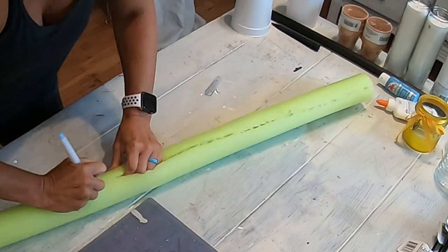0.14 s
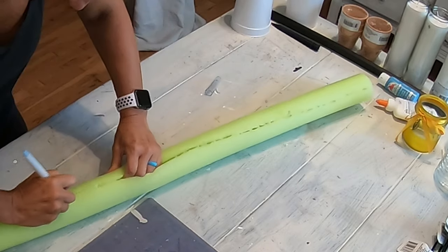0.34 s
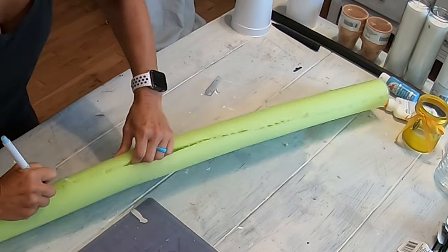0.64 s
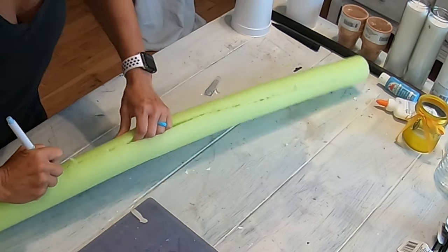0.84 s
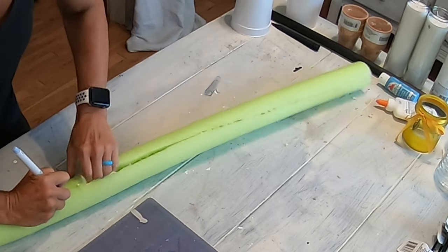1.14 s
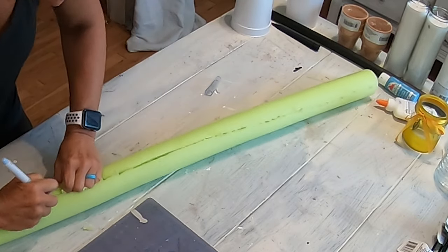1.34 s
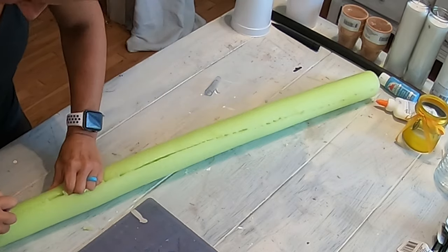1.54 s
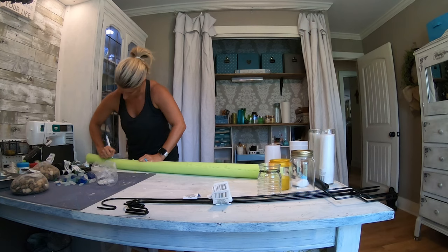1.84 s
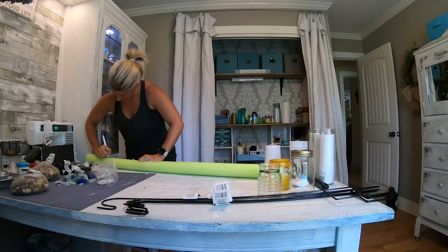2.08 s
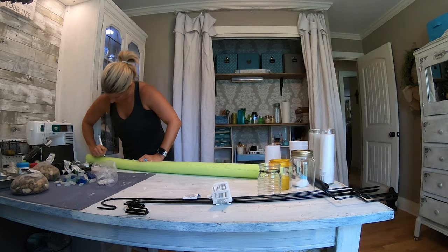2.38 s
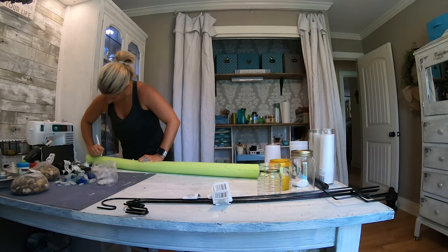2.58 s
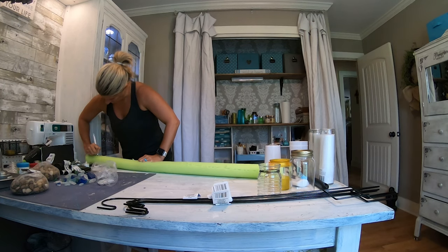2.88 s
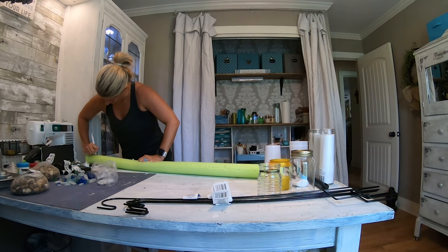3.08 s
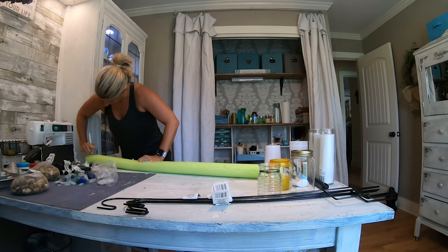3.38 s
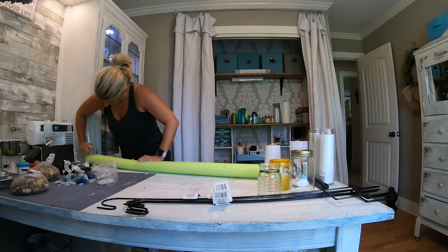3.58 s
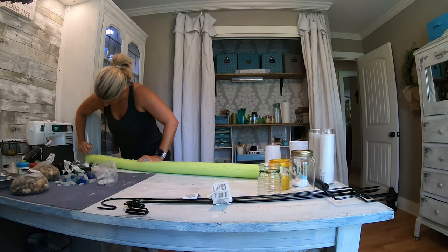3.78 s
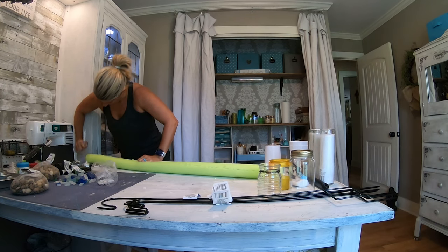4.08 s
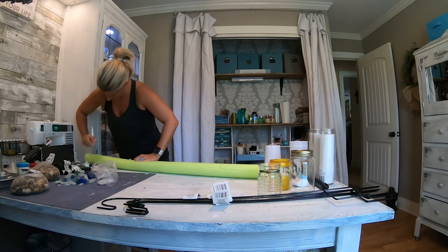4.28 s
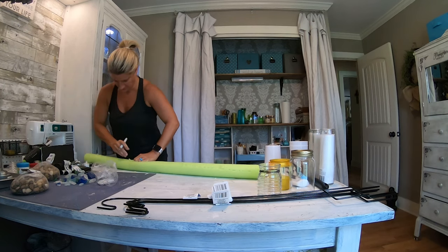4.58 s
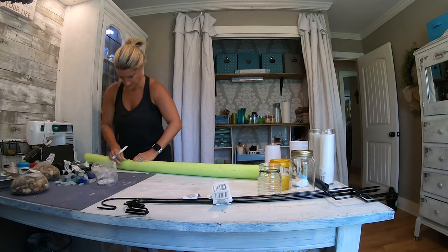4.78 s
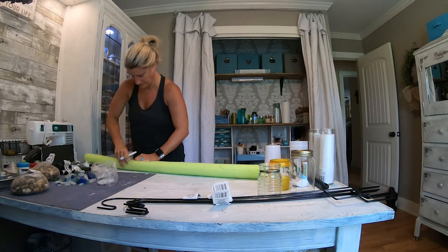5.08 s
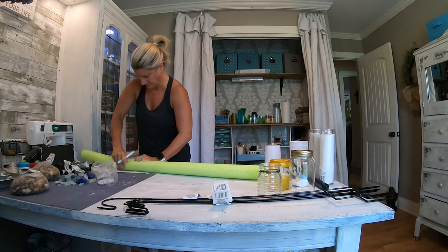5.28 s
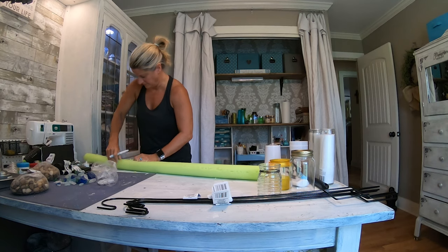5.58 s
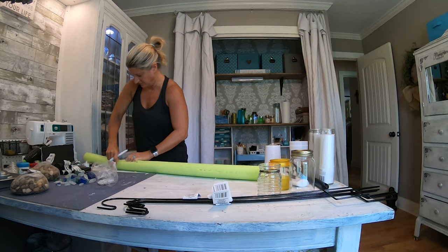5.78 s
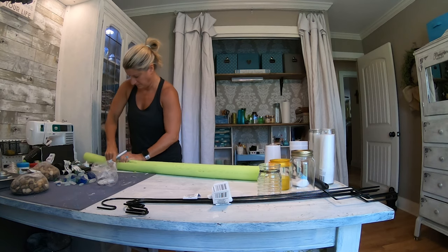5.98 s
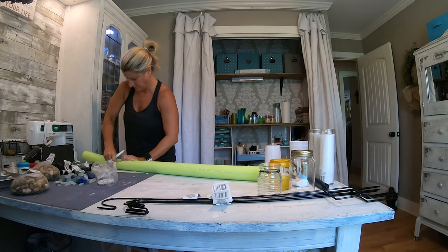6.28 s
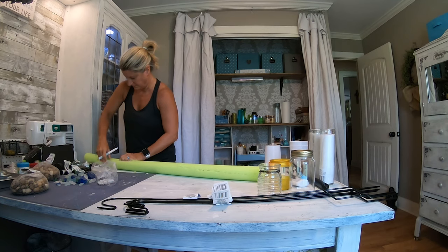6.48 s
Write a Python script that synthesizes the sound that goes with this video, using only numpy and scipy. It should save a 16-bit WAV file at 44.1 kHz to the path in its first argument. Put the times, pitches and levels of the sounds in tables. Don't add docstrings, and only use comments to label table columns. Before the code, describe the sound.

Sped-up, high-pitched sawing through a foam tube chatters in quick squeaky snaps, then drops to normal-speed crackly rasping cuts with dull table thuds.

```python
import sys
import numpy as np
from scipy import signal
from scipy.io import wavfile
from scipy.ndimage import uniform_filter1d

SR = 44100
rng = np.random.default_rng(int(sys.argv[2]) if len(sys.argv) > 2 else 0)


def attenuation_scalar(level_db):
    decades = np.asarray(level_db, float) / 20
    return 10 ** decades


def digitize_waveform(pressure):
    field = np.atleast_2d(pressure).T
    bounded = np.clip(field, -1, 1)
    quanta = np.round(bounded * 32767).astype(np.int16)
    wavfile.write(sys.argv[1], SR, quanta)


N = 292383
SPEED_UP, CHANGE_S = 3, 1.822
STEP = 32


def rms_one(x):
    return x / np.sqrt(np.mean(x ** 2) + 1e-20)


def at_hz(points, hz):
    table_hz, table_db = np.array(points).T
    return np.interp(np.log(hz), np.log(table_hz), table_db)


def drift(rate, size, sr):
    r = np.exp(-2 * np.pi * rate / sr)
    noise = rng.standard_normal(size + 3000)
    return rms_one(signal.lfilter([1], [1, -2 * r, r * r], noise)[3000:])


def band_pass(order, low_hz, high_hz):
    return signal.butter(order, [low_hz, high_hz], "band", fs=SR, output="sos")


def high_pass(hz):
    return signal.butter(2, hz, "high", fs=SR, output="sos")


def resonance(x, hz, width):
    r = np.exp(-np.pi * width / SR)
    poles = [1, -2 * r * np.cos(2 * np.pi * hz / SR), r * r]
    return signal.lfilter([(1 - r * r) / 2, 0, (r * r - 1) / 2], poles, x)


def crackle(size, speed, per_s, spread_db, lumpy_db, grain_share):
    bursting = rng.random(size) < per_s * speed / SR
    clicks = bursting * attenuation_scalar(spread_db * np.minimum(rng.exponential(1, size), 4))
    lumps = attenuation_scalar(lumpy_db * drift(90 * speed, size, SR))
    share = np.clip(grain_share, 0, 1)
    grains = rms_one(clicks * rng.choice([-1, 1], size))
    near = np.sqrt(share) * grains + np.sqrt(1 - share) * rng.standard_normal(size)
    diffuse = rng.standard_normal(size)
    return np.array([rms_one(near * lumps), diffuse])


def echoes(x, speed, t60, wet_db, change):
    n, hop = np.arange(int(.12 * SR / speed)), int(.4 * SR / speed)
    fade = attenuation_scalar(-60 * n * speed / (t60 * SR))
    kept = rng.standard_normal((len(x), len(n)))
    wet = np.zeros((len(x), x.shape[1] + len(n)))
    for a in range(0, x.shape[1], hop):
        tail = (kept + change * rng.standard_normal(kept.shape)) * fade
        tail = tail / np.sqrt(np.sum(tail ** 2) / len(x))
        piece = signal.fftconvolve(x[:, a:a + hop], tail, axes=1)
        wet[:, a:a + piece.shape[1]] += piece
    return rms_one(x + attenuation_scalar(wet_db) * wet[:, :x.shape[1]])


ATTACK_S = [.002, .004, .02, .04]
BITE_DB = [4, 5, 19, 35.5]
SAG_DB = [5.26, 2.4, 3.2, 4.3]


def push_shape(since, hold, speed, release):
    bite_s = 0.0026
    attack, bite, sag, fall = (np.array(c)[:, None] for c in (ATTACK_S, BITE_DB, SAG_DB, release))
    u, hold = np.maximum(since, 0) * speed, max(hold * speed, 1e-3)
    rising = 20 * np.log10(np.clip(since * speed / attack, 1e-5, 1))
    held = bite * np.exp(-u / bite_s) - sag * np.minimum(u / hold, 1)
    return rising + held - fall * np.maximum(u - hold, 0)


def stroke_levels(strokes, t, speed):
    cuts, rubs, thuds, release, quiet_db, table_db = strokes
    thud_in_tube_db = -9.5
    power = attenuation_scalar(2 * np.array(quiet_db))[:, None] + 0 * t
    for s, db, hold, fizz_db, tube_db in cuts:
        layers_db = db + np.array([[0], [fizz_db], [tube_db], [table_db]])
        power += attenuation_scalar(2 * (layers_db + push_shape(t - s, hold, speed, release)))
    for s, db, width, fizz_db, tube_db in rubs:
        layers_db = db + np.array([[0], [fizz_db], [tube_db], [table_db]])
        power += attenuation_scalar(2 * (layers_db - 10 * ((t - s) / width) ** 2))
    for s, db, hold in thuds:
        layers_db = db + np.array([[thud_in_tube_db], [0]])
        power[2:] += attenuation_scalar(2 * (layers_db + push_shape(t - s, hold, speed, release)[3]))
    return 10 * np.log10(power)


# [pitch_hz, width_hz, level_db]
TUBE = [(210.7, 19.4, 9), (342, 33, -9), (707, 71, 4.5), (1095, 255, -0.5), (1750, 170, -50),
        (2540, 180, -20)]
# [pitch_hz, likeness 0 to 1]
LIKENESS = [(40, 0.56), (380, 1), (700, 0.56), (2400, 0.55), (4200, 0.87), (6000, 0.18), (13000, 0.036)]


def sawing(strokes, spectrum, bands, start, size, speed, patchy_db, ring_db):
    t = (start + np.arange(0, size + STEP, STEP)) / SR
    grid = np.geomspace(30, 16000, 400)
    power = attenuation_scalar(2 * at_hz(spectrum, grid)) * np.gradient(grid)
    held = [10 * np.log10(power[(grid > a) & (grid < b)].sum()) for a, b in bands]
    order = np.argsort([a for a, b in bands])
    centres = np.log([np.sqrt(a * b) for a, b in bands])[order]
    lift = (stroke_levels(strokes, t, speed) - np.array(held)[:, None])[order]
    sources = [crackle(size, speed, per_s=2300.0, spread_db=6.0, lumpy_db=2.5, grain_share=0.61)
               for k in range(2)]
    sources = [echoes(rows, speed, t60=.16, wet_db=0., change=1.7) for rows in sources]
    edges = 40 * 2 ** np.arange(0, 8.8, .3)
    out = np.zeros((2, size))
    for k, (low, high) in enumerate(zip(edges, edges[1:])):
        mid, side = signal.sosfilt(band_pass(2, low, high), sources[k % 2])
        hz = np.sqrt(low * high)
        weights = [np.interp(np.log(hz), centres, row) for row in np.eye(4)]
        patches = patchy_db * drift(14 * speed, len(t), SR / STEP)
        level_db = at_hz(spectrum, hz) + weights @ lift + patches
        gain = np.interp(np.arange(size) / STEP, np.arange(len(t)), attenuation_scalar(level_db)) * np.sqrt(SR / 2)
        alike = np.clip(at_hz(LIKENESS, hz / speed), 0, .98)
        out += gain * (np.sqrt((1 + alike) / 2) * mid + np.sqrt((1 - alike) / 2) * side * [[1], [-1]])
    rings = sum(resonance(out, hz * speed, width * speed) * attenuation_scalar(db + ring_db) for hz, width, db in TUBE)
    return out + rings


# [pitch_hz, level_db per Hz]
FAST_FOAM = [(35, -92), (60, -36), (256, -7.5), (315, -6), (389, -3.5), (621, -4.5), (822, -9), (1010, -5),
             (1110, -6), (2710, 2.5), (5590, 8), (10000, -4), (16000, -18.5)]
# [low_hz, high_hz]
FAST_BANDS = [
    (2400, 9000),
    (10000, 15000),
    (750, 1800),
    (200, 600),
]
# [start_s, tearing_db, hold_s, fizz_db re tearing, tube_db re tearing]
FAST_CUTS = [(.055, -26.5, 0.036, -4.5, -12), (.18, -23, 0.019, -4, -12), (.257, -23, 0.039, 1, -1),
             (.339, -27.5, 0.034, -2, -5), (.394, -35.5, 0.017, 0, 1), (.432, -30.5, 0.005, 3, 3),
             (.4385, -26, 0.012, 1, -5), (.449, -22, .006, 3, 2), (.457, -20, 0.024, -9, -6.5),
             (.499, -39, .006, -16, 17), (.521, -26, 0.0073, 1, -1), (.526, -26, 0.015, -1, -4),
             (.576, -29.5, 0.01, -4, -6), (.632, -38, 0.038, -4.5, -28), (1.042, -27, 0.0094, -8.5, 7),
             (1.13, -25.5, 0.051, -5, -4), (1.255, -28, 0.009, -5, -15), (1.2795, -18.5, 0.025, -9, -11.5),
             (1.332, -24, 0.0052, -15, 10.5), (1.388, -35, 0.013, 2, -13), (1.439, -28.5, 0.029, -4, -10.5),
             (1.519, -21.5, 0.047, -8.5, -12.5), (1.592, -21, 0.023, -5, -10),
             (1.62, -18.5, 0.024, -12, -12.5), (1.66, -20.5, 0.02, -12, -11),
             (1.6958, -14.5, 0.018, -18, -10.5), (1.7408, -18.5, 0.022, -16, -7.5),
             (1.774, -24.5, .008, -5, -6), (1.7855, -20.5, 0.026, -11.5, -8)]
# [middle_s, tearing_db, half_width_s, fizz_db re tearing, tube_db re tearing]
FAST_RUBS = [(.002, -37, 0.044, -1, -4.5), (.125, -44.5, 0.034, 1, -16), (.175, -33, 0.014, 1, -10),
             (.235, -42, 0.035, 1, 1), (0.56, -31, 0.027, -4, -4), (0.821, -47.5, 0.036, -1.5, -9),
             (0.919, -56, 0.021, -31, -5), (.975, -66, 0.007, -20, 0), (.722, -68, 0.0051, -13, 8),
             (.985, -49.5, 0.057, 0.5, -20), (1.101, -38, 0.052, -4, -9), (1.25, -39, 0.068, -4, 1),
             (1.43, -35.5, 0.037, 4.5, -11), (.361, -28, 0.0074, -15, -19), (.745, -77, 0.027, -14, 19.5),
             (1.02, -53, 0.012, -5, -1)]
# [start_s, level_db, hold_s]
FAST_THUDS = [(0.107, -21, 0.014), (0.127, -38, 0.018), (0.176, -21.5, 0.018), (0.197, -39, 0.016),
              (0.216, -43, 0.016), (0.26, -34, 0.016), (0.314, -41, 0.075), (0.442, -35.5, 0.032),
              (0.516, -39, 0.097), (0.616, -42, 0.05), (1.045, -28.5, 0.015), (1.117, -41, 0.068),
              (1.339, -29, 0.044)]
FAST_RELEASE_DB_PER_S = [242, 263, 248, 220]
FAST_QUIET_DB = [-66, -70, -68, -56.5]


def fast_sawing(size):
    table_share_db = -28
    strokes = (FAST_CUTS, FAST_RUBS, FAST_THUDS, FAST_RELEASE_DB_PER_S, FAST_QUIET_DB, table_share_db)
    return sawing(strokes, FAST_FOAM, FAST_BANDS, 0, size, SPEED_UP, patchy_db=1.8, ring_db=-13.5)


# [pitch_hz, level_db per Hz]
FOAM = [(30, -44), (55, -6), (113, 32.5), (272, -5), (316, -1.5), (612, -14), (700, -5.5), (1000, -7),
        (1900, 2.1), (2900, -0.5), (4100, -7.5), (6000, -6), (10500, -15.5), (16000, -27)]
# [low_hz, high_hz]
BANDS = [
    (800, 3000),
    (4000, 10000),
    (250, 600),
    (70, 200),
]
# [start_s, tearing_db, hold_s, fizz_db re tearing, tube_db re tearing]
CUTS = [(1.822, -16.5, 0.03, -6, -5), (1.857, -19.5, 0.064, -9.5, -16), (1.973, -17.5, 0.089, -5.5, -9),
        (2.104, -16, 0.013, -9.5, -12), (2.223, -14, 0.034, -6, -14), (2.345, -30, 0.037, 1, -7),
        (2.433, -25.5, 0.13, -2, -9), (2.476, -19, 0.054, -5, -3), (2.68, -19, 0.05, -4, -3),
        (2.861, -38, .015, 5.5, -12), (2.883, -38, .015, 8, -4), (2.907, -32.5, 0.032, 8.5, -1),
        (2.93, -21.5, 0.047, -2, -2), (3.098, -39.5, 0.0099, 10, -14), (3.139, -16, 0.012, -6, -25),
        (3.172, -14.5, 0.019, -10.5, -12), (3.265, -19, 0.028, -13, -10.5), (3.458, -45.5, 0.015, 10, 5),
        (3.618, -32.5, .02, -4.5, -24), (3.692, -18.5, 0.012, -6, -10.5), (3.804, -29.5, 0.012, -4.5, -21),
        (3.843, -30, 0.03, -9.5, -29), (3.897, -32.5, 0.11, -5.5, -21), (3.938, -15.5, 0.036, -12, -4),
        (4.577, -49.5, 0.13, -6.5, -6), (4.641, -31, 0.035, -12, -5.5), (4.928, -29.5, 0.041, -10.5, -9),
        (5.067, -28.5, 0.078, -18, -9.5), (5.103, -33, 0.068, -7.5, -10), (5.15, -24, 0.011, 1.5, 0),
        (5.183, -23, 0.075, -10, -10.5), (5.421, -39.5, .03, -5, -41), (5.752, -29.5, 0.035, -4.5, -8),
        (6.002, -28, 0.0086, -4, -7), (6.019, -19.5, 0.04, -12, -14), (6.055, -22, 0.039, -13.5, -10),
        (6.105, -30, 0.03, -7, 0), (6.143, -26.5, 0.042, -9, -3.5), (6.335, -25, 0.038, -14.5, -26)]
# [middle_s, tearing_db, half_width_s, fizz_db re tearing, tube_db re tearing]
RUBS = [(2.18, -32.5, 0.24, -5, -11), (2.63, -46.5, 0.53, 5, -1), (2.8, -44, 0.025, 11, -30),
        (3.235, -23, 0.077, -5, -6.5), (3.3, -32, 0.047, -2.5, -3), (3.515, -26.5, 0.038, 0, -10),
        (3.58, -39, 0.053, 0.5, -12), (3.664, -28.5, 0.04, -3, -7.5), (3.729, -35, 0.014, -16, 1.5),
        (4.008, -16.5, 0.062, -15.5, -5), (4.065, -30, 0.08, -14.5, 5), (4.148, -43, 0.033, -3, 3),
        (3.77, -42, 0.054, -9, -21), (4.309, -27.5, 0.079, -7, -13.5), (4.43, -50, 0.06, 8.5, 1),
        (4.699, -29, 0.033, -14, -9), (4.745, -35, 0.067, -11, -4.5), (4.85, -37, 0.046, -11.5, -11),
        (4.888, -33, 0.051, -10.5, -9.5), (4.99, -45, 0.021, -14, -19), (5.38, -46, 0.077, -8.5, -8.5),
        (5.518, -24.5, 0.068, -9.5, -1.5), (5.619, -25.5, 0.062, -12.5, -6.5),
        (5.71, -35.5, 0.079, -5.5, -4.5), (5.83, -25.5, 0.081, -8.5, -3.5), (5.896, -23, 0.058, -11, -12),
        (5.945, -25, 0.083, -11, -10), (6.28, -48.5, 0.063, 0, -2), (6.416, -21, 0.073, -13, -8.5),
        (6.496, -24, 0.068, -13.5, -11.5), (6.64, -22, 0.073, -7, -10.5)]
# [start_s, level_db, hold_s]
THUDS = [(1.841, -34, 0.06), (1.975, -34.5, 0.054), (2.099, -34, 0.021), (2.479, -30, 0.062),
         (2.692, -27, 0.017), (2.936, -33.5, 0.032), (3.15, -45, 0.16), (3.491, -60, 0.045),
         (3.688, -45, 0.011), (3.946, -24.5, 0.12), (4.1, -38, 0.12), (4.23, -40, 0.021),
         (5.471, -26.5, 0.053), (6.361, -25.5, 0.068)]
RELEASE_DB_PER_S = [205, 190, 215, 237]
QUIET_DB = [-56, -63.5, -66, -63]


def normal_sawing(start):
    table_share_db = -39.5
    strokes = (CUTS, RUBS, THUDS, RELEASE_DB_PER_S, QUIET_DB, table_share_db)
    return sawing(strokes, FOAM, BANDS, start, N - start, speed=1, patchy_db=1.2, ring_db=-4.0)


# [pitch_hz, level_db, decay_s]
BITE_MODES = [(675, -32.5, .004), (1140, -30.5, 0.0029), (1940, -23.5, 0.0066), (2624, -24, 0.0044),
              (3450, -29, 0.0023)]


def snaps(table, speed, decay_s, low_hz, high_hz, edge_db):
    out, n = np.zeros(N + 600), np.arange(600)
    noise = rng.standard_normal((len(table), 600))
    tear = np.hanning(2 + 9 // speed)[1:-1]
    sign = np.sign(noise[:, :1])
    noise[:, :len(tear)] = 6 * tear * sign
    bursts = noise * np.exp(-n * speed / (decay_s * SR))
    body = band_pass(1, low_hz * speed, high_hz * speed)
    edge = band_pass(2, high_hz * speed, min(2.4 * high_hz * speed, 16000))
    echo_s, echo_db = .0028, -6
    lag = round(echo_s * SR / speed)
    u = n * speed / SR
    modes = np.array([attenuation_scalar(db) * np.exp(-u / decay) * np.sin(2 * np.pi * hz * u)
                      for hz, db, decay in BITE_MODES])
    strengths = attenuation_scalar(3.7 * rng.standard_normal((len(table), len(modes))))
    rung = strengths @ modes * np.hanning(1200)[600:] * sign
    rung = signal.sosfilt(high_pass(400 * speed), rung)
    for (s, db), burst, ring in zip(table, bursts, rung):
        bite = signal.sosfilt(body, burst) + attenuation_scalar(edge_db) * signal.sosfilt(edge, burst)
        bite[lag:] += attenuation_scalar(echo_db) * bite[:-lag]
        at = round(s * SR)
        out[at:at + 600] += attenuation_scalar(db) * (bite / np.abs(bite).max() + ring)
    return out[:N]


def workroom(x, speed, t60, wet_db):
    n = np.arange(int(.5 * SR / speed))
    tail = rng.standard_normal((2, len(n))) * attenuation_scalar(-60 * n * speed / (t60 * SR)) * (n > .002 * SR / speed)
    tail = signal.lfilter([1], [1, -.5], tail)
    tail = tail / np.sqrt(np.sum(tail ** 2) / 2)
    return x + attenuation_scalar(wet_db) * signal.fftconvolve(x[None], tail, axes=1)[:, :N]


# [start_s, peak_db]
FAST_SNAPS = [(0.0215, -23.0), (0.0559, -14.0), (0.1844, -10.0), (0.2348, -24.0), (0.2618, -11.0),
              (0.2804, -8.0), (0.3076, -17.0), (0.3957, -14.0), (0.45, -5.0), (0.4592, -7.0),
              (0.5004, -14.0), (0.5262, -8.0), (1.0433, -14.0), (1.12, -19.0), (1.1336, -1.0),
              (1.1473, -8.0), (1.1602, -4.0), (1.2809, -7.0), (1.333, -18.0), (1.4401, -15.0),
              (1.4596, -14.0), (1.5266, -11.0), (1.5949, -5.0), (1.621, -3.0), (1.6605, -4.0),
              (1.6961, -2.0), (1.7412, -1.0), (1.7744, -7.0), (1.7858, -8.0), (1.8108, -7.0)]
# [start_s, peak_db]
SNAPS = [(1.8581, -1.5), (1.9734, 3), (1.9816, -8.0), (2.1076, -7.0), (2.1152, -10.0), (2.2255, -3),
         (2.3455, -14.0), (2.4339, -17.0), (2.478, -3.0), (2.681, -2.0), (2.9317, -7.0), (3.1011, -23.0),
         (3.1412, -7.0), (3.1731, -7.0), (3.181, -9.0), (3.6735, -16.0), (3.8426, -21.0), (3.9389, -0.5),
         (5.103, -16.0), (5.1516, -11), (5.1675, -8.0), (5.1859, -11.0), (5.2112, -4.0), (5.2342, -11.0),
         (6.0034, -8), (6.02, -6.0), (6.0555, -4), (6.1109, -11.0), (6.144, -10.0), (6.187, -13.0),
         (2.1045, -10.0), (2.1115, -10.0), (3.146, -9.0), (3.2655, -9.0), (3.271, -9.0), (3.6945, -15.0),
         (4.6955, -19.0), (5.1625, -9.0), (5.5575, -19.0)]


def blade_bites():
    fast = snaps(FAST_SNAPS, SPEED_UP, 0.0015, 1640, 3500, edge_db=-6.0)
    fast = workroom(fast, SPEED_UP, 1.0, wet_db=-4.0)
    slow = snaps(SNAPS, 1, .0005, 700, 2800, edge_db=-7.)
    return fast + workroom(slow, 1, .3, wet_db=-6.)


# [start_s, pitch_hz, level_db]
SLIT = [(0, 3000, -6), (.105, 308, -3), (.175, 483, 2), (.25, 413, 8), (.33, 3500, -34), (0.601, 650, 15),
        (.7, 6530, -2), (1.043, 289, 15), (1.1, 6200, -7), (1.25, 1500, 2), (1.279, 940, -13),
        (1.333, 715, -2), (1.391, 3520, 3.5), (1.522, 815, 8), (1.822, 300, -11), (1.986, 2100, -7),
        (2.1, 318, 8.5), (2.378, 320, 0), (2.475, 298, 15.5), (2.489, 1100, 6), (2.678, 1350, 4.5),
        (2.929, 1610, 7.5), (3.136, 300, 6.5), (3.45, 330, 8), (3.937, 1770, 2), (4.001, 750, -9),
        (4.2, 1750, -28), (4.575, 720, 10), (4.64, 1980, -6), (4.93, 695, -3), (5.15, 2220, 8),
        (5.18, 720, 3), (5.3, 3000, -20), (5.47, 1950, -3), (5.57, 1200, -5), (5.865, 1950, -1),
        (5.95, 1150, -3), (6.018, 780, 0), (6.075, 760, -2), (6.33, 726, 1), (6.369, 1880, -32)]


def singing_slit(x):
    out = x.copy()
    at = [round(s * SR) for s, hz, db in SLIT] + [N]
    for (s, hz, db), a, b in zip(SLIT, at, at[1:]):
        out[:, a:b] += attenuation_scalar(db) * resonance(x[:, a:b], hz, .15 * hz)
    return out


# [start_s, pitch_hz, peak_db, decay_s]
POPS = [(.109, 472, -23, 0.0089), (0.129, 303, -27.5, .018), (.178, 483, -23, 0.0074),
        (.267, 536, -26, 0.0069), (.263, 322, -27.5, 0.011), (.463, 1500, -24, 0.0044),
        (0.534, 1023, -22, 0.0077), (.815, 594, -50, 0.01), (1.01, 603, -46, .006),
        (1.043, 1000, -21.5, 0.0019), (1.045, 346, -25, 0.0095), (1.332, 660, -15.5, 0.0053),
        (1.333, 1020, -22.5, .006), (1.358, 340, -28.5, 0.0076), (1.523, 2120, -21.5, .003),
        (1.541, 884, -27, 0.0015), (1.617, 1330, -22.5, 0.01), (2.105, 330, -25, 0.0087),
        (2.224, 350, -25, 0.012), (2.346, 380, -26, 0.0079), (2.476, 1120, -11, 0.0044),
        (2.482, 319, -20.5, 0.013), (2.513, 1140, -14, 0.0072), (2.682, 1720, -16, 0.005),
        (2.697, 1680, -13, 0.0051), (2.7, 1270, -18, 0.018), (2.718, 1390, -15, 0.0055),
        (2.929, 1450, -22, .005), (2.943, 1937, -17, 0.0064), (3.139, 1890, -12, .004),
        (3.205, 1780, -15, .004), (3.24, 340, -18.5, 0.0063), (3.264, 1160, -26, 0.0026),
        (3.267, 326, -18.5, 0.0044), (3.286, 332, -30, 0.0043), (3.503, 340, -34, 0.011),
        (3.939, 1894, -19, 0.0038), (4.001, 249, -16, .007), (4.007, 1070, -13.5, .007),
        (4.016, 828, -16.5, 0.018), (4.031, 510, -21, 0.0083), (5.16, 1783, -12.5, 0.0096),
        (5.165, 2190, -12, 0.0052), (5.185, 725, -29, .01), (5.21, 680, -31, 0.0051),
        (6.019, 735, -16.5, .008), (6.028, 794, -15.5, 0.019), (6.055, 1860, -14, .004),
        (6.142, 1880, -19, 0.0046), (6.344, 713, -27, 0.0065)]


def pops():
    rise, spread_rad, wobble_db = 0.44, 0.26, 6.5
    out, u = np.zeros((2, N + 4000)), np.arange(4000) / SR
    for (s, hz, db, decay), c in zip(POPS, rng.standard_normal((len(POPS), 41))):
        shape = (1 - np.exp(-u / (rise * decay))) * np.exp(-u / decay)
        shape *= attenuation_scalar(wobble_db * np.interp(u * hz / 3, np.arange(40), c[1:]))
        phase = spread_rad * c[0] * np.array([[1], [-1]])
        a = round(s * SR)
        out[:, a:a + 4000] += attenuation_scalar(db) * shape / shape.max() * np.sin(2 * np.pi * hz * u + phase)
    return out[:, :N]


def knocks(thuds, modes, speed, knock_db):
    rise_s = 0.011
    out, t = np.zeros(N), np.arange(N) / SR
    for (s, db, hold), spread in zip(thuds, rng.standard_normal((len(thuds), len(modes)))):
        a = round(s * SR)
        u = (t[a:a + SR // 3] - t[a]) * speed
        rise = 1 - np.exp(-u / rise_s)
        for (hz, mode_db, decay), c in zip(modes, spread):
            level = attenuation_scalar(db + knock_db + mode_db + 4.3 * c)
            out[a:a + len(u)] += rise * level * np.exp(-u / decay) * np.sin(2 * np.pi * hz * u)
    return out


# [pitch_hz, level_db, decay_s]
FAST_TABLE_MODES = [(103, -1, 0.079), (158, 6, 0.025), (199, -4, 0.047)]
# [pitch_hz, level_db, decay_s]
TABLE_MODES = [(115.5, -4.5, 0.032), (145.6, 4, 0.011), (208.8, -8, 0.043)]


def table_knocks():
    fast = knocks(FAST_THUDS, FAST_TABLE_MODES, SPEED_UP, knock_db=-5.5)
    return fast + knocks(THUDS, TABLE_MODES, 0.99, knock_db=-3)


def table_rocks():
    start_s, level_db, pitch_hz, rise_s = 3.99, -36, 58.5, 0.036
    u = np.maximum(np.arange(N) / SR - start_s, 0)
    return attenuation_scalar(level_db) * u / rise_s * np.exp(1 - u / rise_s) * np.sin(2 * np.pi * pitch_hz * u)


def scene():
    cut = round(CHANGE_S * SR)
    saw = attenuation_scalar(-3.0) * np.hstack([fast_sawing(cut), normal_sawing(cut)])
    saw = saw * attenuation_scalar(np.array([[.3], [-.3]]))
    return singing_slit(saw + blade_bites()) + pops() + table_rocks() + table_knocks()


def thin_top(x, shelf_hz, end_hz, shelf_db, beyond_db, keep_db, lost):
    hz, t, cells = signal.stft(x, SR, nperseg=1024)
    top = hz > shelf_hz
    ragged_end = end_hz + 350 * drift(11, len(t), SR / 512)
    cells[:, top] *= attenuation_scalar(shelf_db + beyond_db * (hz[top][:, None] > ragged_end))
    bands_kept = rng.random((64, len(t) // 3 + 1)) > lost
    kept_cells = np.repeat(np.repeat(bands_kept, 6, axis=0), 3, axis=1)
    cells[:, top] *= kept_cells[:top.sum(), :len(t)]
    cells[:, top] *= uniform_filter1d(np.abs(cells[:, top]), size=7, axis=1) > attenuation_scalar(keep_db)
    return signal.istft(cells, SR, nperseg=1024)[1][:, :x.shape[1]]


def spared_edges(x, loud, keep_s, top_hz, edge_db):
    gate = uniform_filter1d(1. * (np.abs(x).max(axis=0) > loud), size=round(keep_s * SR)) > 0
    treble = signal.sosfilt(band_pass(4, top_hz, 16500), x)
    return attenuation_scalar(edge_db) * uniform_filter1d(1. * gate, size=40) * treble


def low_pass(x):
    return signal.sosfilt(signal.butter(12, 16700, fs=SR, output="sos"), x)


def record(dry):
    cut = round(CHANGE_S * SR)
    fast = signal.sosfilt(high_pass(150), dry[:, :cut])
    fast = signal.sosfilt(signal.cheby2(14, 50, 16300, fs=SR, output="sos"), fast)
    slow = signal.sosfilt(high_pass(35), dry[:, cut:])
    edges = spared_edges(slow, loud=0.98, keep_s=0.0027, top_hz=11000, edge_db=-12)
    slow = edges + thin_top(slow, shelf_hz=10610, end_hz=14600, shelf_db=-8.5, beyond_db=-38.0,
                            keep_db=-106., lost=0.1)
    return low_pass(np.clip(np.hstack([fast, slow]), -1, 1))


dry = scene()
out = record(dry)
digitize_waveform(out)
```